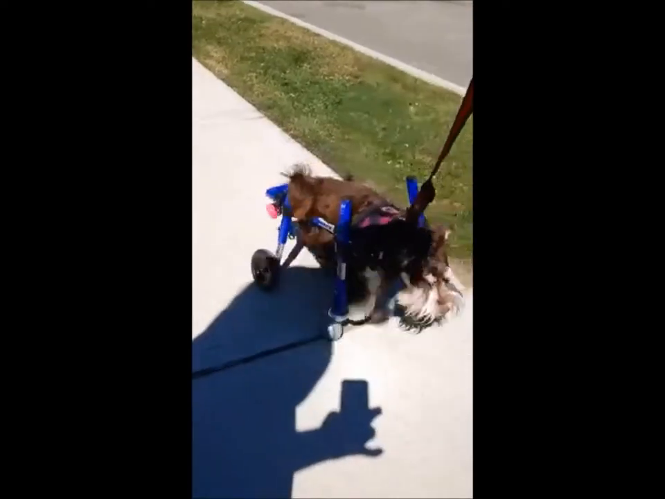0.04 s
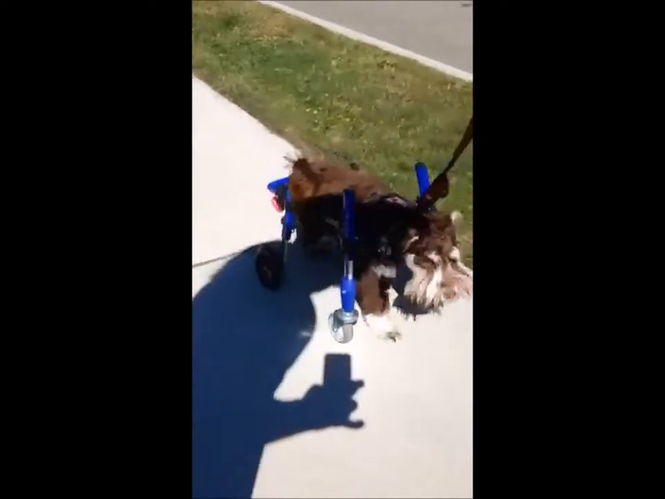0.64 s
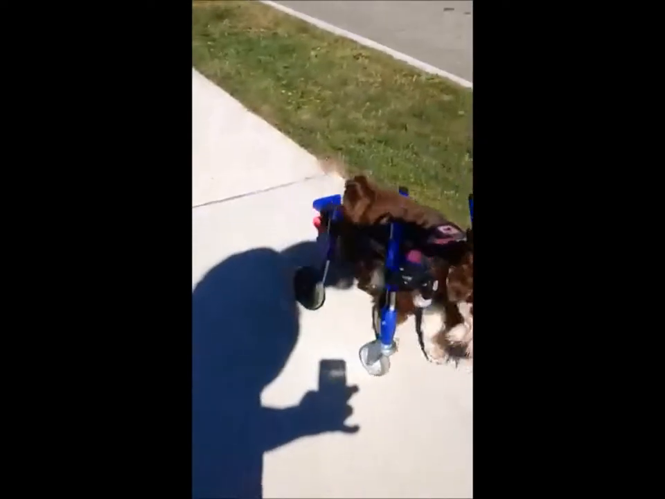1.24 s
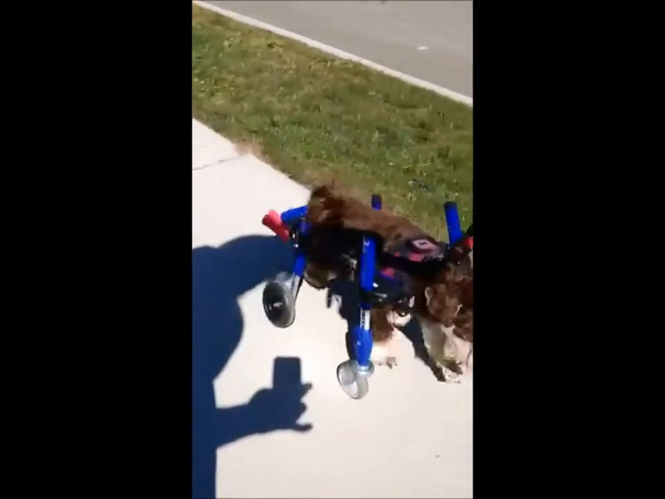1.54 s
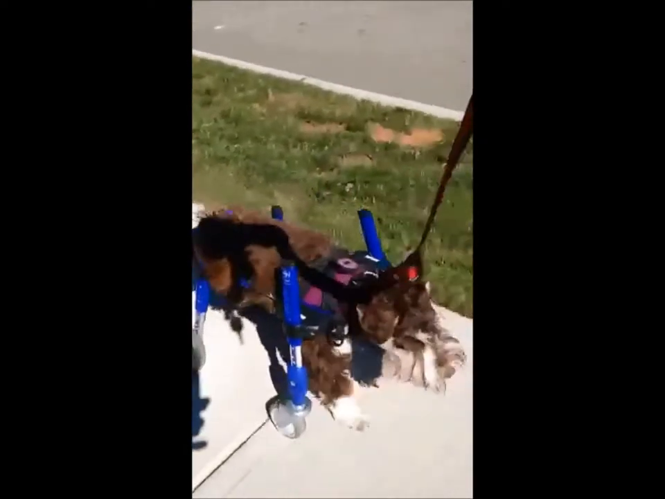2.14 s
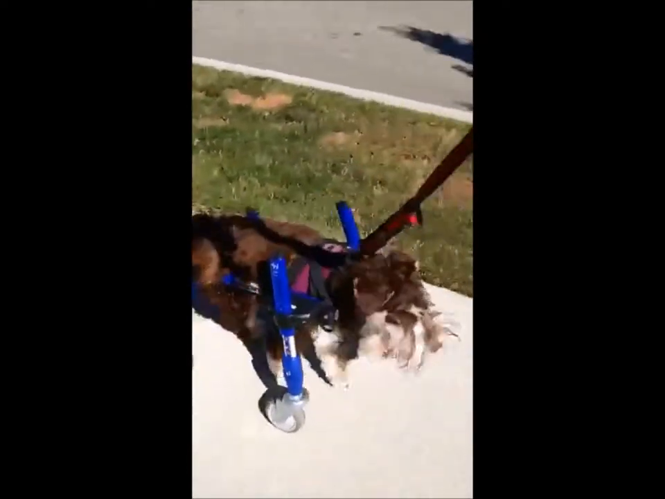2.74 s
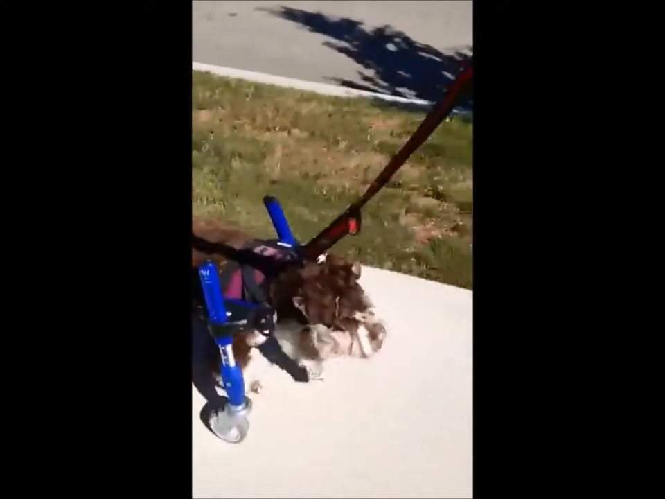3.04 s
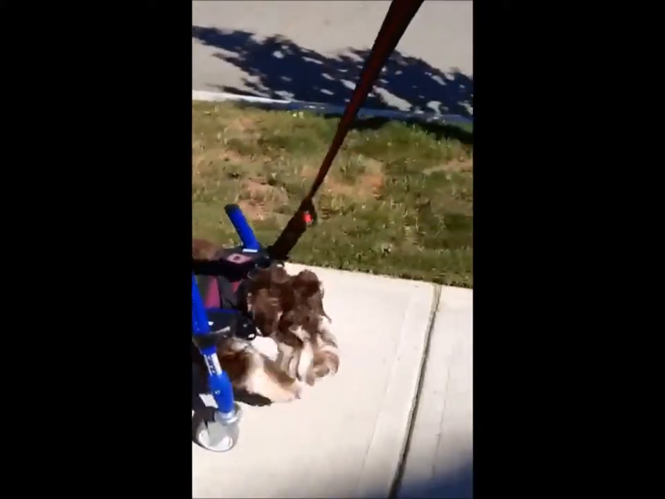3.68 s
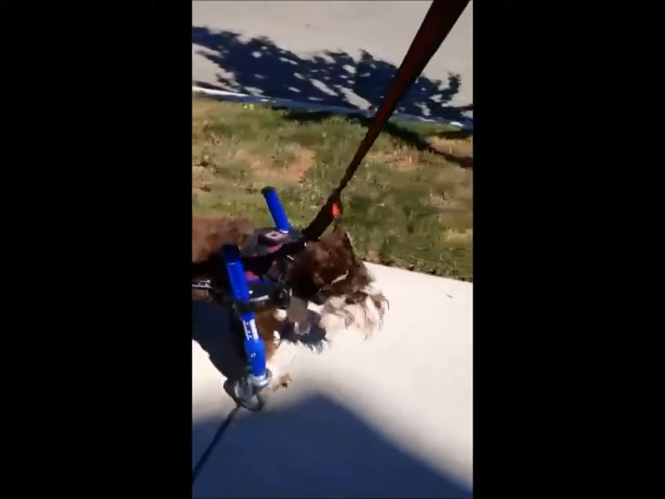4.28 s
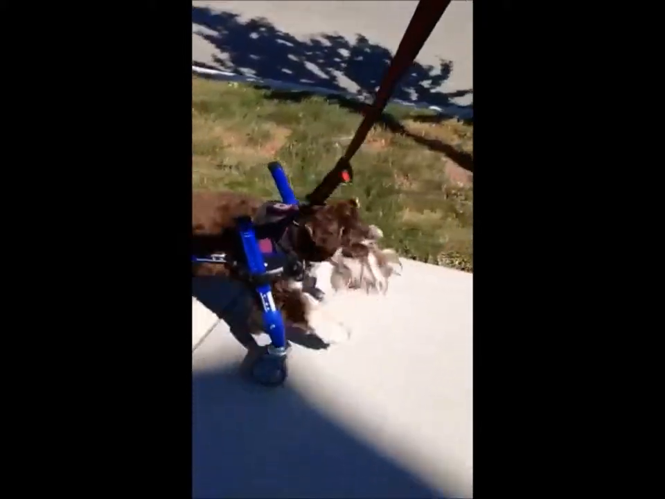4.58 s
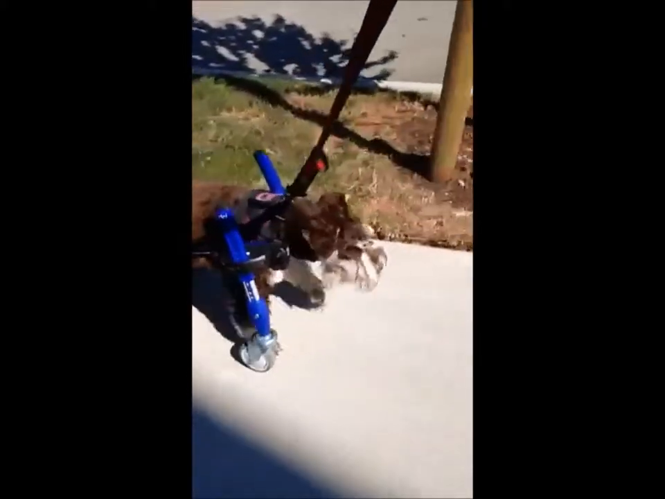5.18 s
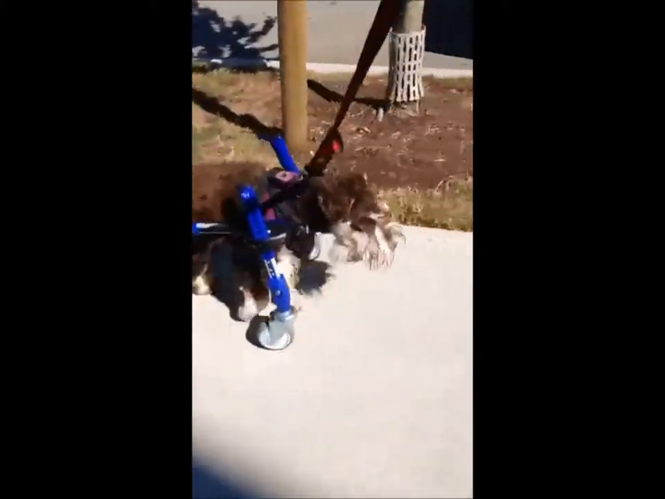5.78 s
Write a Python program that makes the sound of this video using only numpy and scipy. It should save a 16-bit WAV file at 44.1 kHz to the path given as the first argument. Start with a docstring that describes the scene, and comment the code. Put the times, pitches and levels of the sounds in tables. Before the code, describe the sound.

Gritty paw scuffs, claw ticks and rolling wheels of a dog's support cart clatter lightly along a sidewalk, with a little wind later.

```python
"""Small dog in a wheeled cart

Paws, soles and tyres scuff over a gritty concrete sidewalk by stick-slip friction; pads pat and claws
tick. Impacts at the joints between slabs thump the wheels and excite the modes of the cart's frame.
The dog huffs faintly through its resonant muzzle, and small metal parts chink. Later a breeze buffets
the hand-held microphone, a metre away, over the faint wash of the street."""
import sys
import numpy as np
from scipy import signal
from scipy.io import wavfile

SR = 44100
rng = np.random.default_rng(int(sys.argv[2]) if len(sys.argv) > 2 else 0)


def put_to_file(sound):
    """Save the sound as 16-bit audio at rate SR, in the file named by the first command-line argument."""
    columns = np.atleast_2d(sound).T  # one column per channel
    safe = np.clip(columns, -1, 1)
    whole_steps = np.round(safe * 32767)
    wavfile.write(sys.argv[1], SR, whole_steps.astype(np.int16))


N = 265437
TIME = np.arange(N) / SR


def amp(db):
    """Amplitude ratio of a level in decibels."""
    return 10 ** (np.asarray(db) / 20)


def unit(x):
    """Normalisation to an rms of one."""
    return x / np.sqrt(np.mean(x ** 2) + 1e-20)


def spectrum(points, size=2048):
    """Gain curve interpolated in log frequency, falling 12 dB per octave past the last point."""
    hz, db = np.transpose(points)
    f = np.fft.rfftfreq(size, 1 / SR) + 1
    return amp(np.interp(np.log(f), np.log(hz), db)) / np.maximum(f / hz[-1], 1) ** 2


def resonances(modes, size=2048):
    """Gain curve of damped resonances, summed in power."""
    f = np.fft.rfftfreq(size, 1 / SR)
    return np.sqrt(sum(amp(db) ** 2 / (1 + (2 * (f - hz) / width) ** 2) ** 2 for hz, width, db in modes))


def colour(x, gain):
    """Minimum-phase filtering: the response rings after a click, never before."""
    log_gain = np.log(np.maximum(np.r_[gain, gain[-2:0:-1]], 1e-5))
    response = np.fft.ifft(np.exp(np.conj(signal.hilbert(log_gain)))).real
    return signal.fftconvolve(x, response[:len(gain)])[:len(x)]


def steady(x, span_s):
    """Division by the running rms evens out slow changes of level and keeps the finer detail."""
    window = np.hanning(int(span_s * SR))
    power = signal.fftconvolve(x ** 2, window / window.sum(), "same")
    return x / np.sqrt(np.maximum(power, 1e-12))


def wander(cutoff_hz):
    """Random modulation: low-passed noise of unit rms."""
    return unit(signal.sosfilt(signal.butter(2, cutoff_hz, fs=SR, output="sos"), rng.standard_normal(N)))


def add(mix, start_s, sound):
    """Superposition of a sound on the mix."""
    part = mix[max(round(start_s * SR), 0):][:len(sound)]
    part += sound[:len(part)]


def slips(per_s, spread_db, decay_s):
    """Poisson process of slips, many small and a few large, as a power envelope of mean one."""
    strength = amp(spread_db * np.minimum(rng.exponential(1, N), 3.85))
    impulses = strength * (rng.random(N) < per_s / SR)
    power = signal.lfilter([1], [1, -np.exp(-1 / (decay_s * SR))], impulses ** 2)
    return power / power.mean()


def grains(low_hz, high_hz, per_s, spread_db, cycles, pitches=32):
    """Shot noise: tiny random impacts, each ringing for a few cycles at its own pitch."""
    t, out = np.arange(700) / SR, np.zeros(N)
    for hz in np.geomspace(low_hz, high_hz, pitches):
        swell = t * hz / cycles
        grain = swell * np.exp(-swell) * np.sin(2 * np.pi * hz * t)
        chance = rng.random(N) * pitches * SR / per_s
        for i in np.flatnonzero(chance < 1):
            weight = amp(spread_db * min(-np.log(chance[i]), 4))
            add(out, i / SR, (-1) ** i * weight * hz * grain)
    return unit(out)


def body_reflection(x, echo_db=-6.5, delay_s=0.0017, sway_s=0.000498, sway_hz=4):
    """Comb filtering: an echo off the swaying body and frame gives a slowly shifting colour."""
    echo = np.interp(TIME - delay_s - sway_s * np.tanh(wander(sway_hz)), TIME, x)
    return (x + amp(echo_db) * echo) / np.hypot(1, amp(echo_db))


# Tyre noise under the steps, fainter as the cart slows: time_s, level_db
ROLLING = [(0, -50.5), (.4, -46), (.95, -50), (1.05, -51.5), (1.2, -49), (1.44, -52.5), (1.7, -47.5),
           (2.17, -52), (2.5, -47), (2.95, -52.5), (3.3, -48.5), (4.3, -56.5), (4.65, -55.5), (4.8, -56.5),
           (4.95, -51), (5.15, -56), (5.38, -49), (5.52, -52.5), (6.02, -48)]
# Feet dragging over the concrete: start_s, length_s, scuff_db, grit_db, fizz_re_grit_db
FOOT_DRAGS = [(0.016, 0.094, -42.5, -48, 1), (0.225, 0.022, -39.5, -40, -8), (0.304, 0.086, -39.5, -41, -2),
              (0.578, 0.055, -43.5, -43, -7), (0.653, 0.079, -50, -50.5, 4), (0.743, 0.2, -52, -69, -2),
              (0.926, 0.12, -63, -48.5, 3.5), (1.112, 0.061, -44.5, -40, -1.5),
              (1.264, 0.13, -47, -42.5, -2), (1.547, 0.063, -39, -51.5, 2.5), (1.69, 0.12, -40, -41, -5),
              (1.749, 0.013, -37.5, -31, 0), (1.864, 0.14, -39.5, -40.5, -6),
              (2.004, 0.12, -48, -46.5, 0.5), (2.228, 0.11, -40.5, -37, -2), (2.367, 0.044, -40, -37.5, -6),
              (2.46, 0.045, -36.5, -30, -4.5), (2.562, 0.12, -40, -37, -1), (2.608, .04, -39, -43, -10),
              (2.695, 0.2, -44.5, -48, 2), (2.788, 0.092, -43.5, -38, -16), (3.036, 0.057, -43.5, -37, 0),
              (3.194, 0.041, -39, -44, -6), (3.252, 0.04, -50, -33.5, -4), (3.397, 0.067, -41, -42.5, -1),
              (3.614, 0.071, -42, -42.5, 0), (3.807, 0.1, -48.5, -43.5, -2), (3.958, .17, -47, -43, -2.5),
              (4.386, 0.074, -45, -44.5, -7), (4.479, 0.093, -41, -38, -3), (4.831, 0.09, -48, -54.5, -10),
              (4.94, 0.069, -45, -44.5, -5), (5.314, 0.076, -43.5, -46, -14),
              (5.379, 0.054, -48, -40.5, -1), (5.577, 0.023, -43, -50.5, 3), (5.654, 0.018, -64, -50, 8.5),
              (5.84, 0.043, -46, -38.5, -12), (5.973, 0.041, -44, -48.5, -19)]


def friction_gains(attack_s=0.0019, release_s=0.014):
    """Incoherent sources add in power: tyres and dragging feet set the scuff, grit and fizz gains."""
    rolling_db = np.interp(TIME, *np.transpose(ROLLING))
    power = amp([rolling_db, rolling_db - 0.5, rolling_db - 1]) ** 2
    for start_s, length_s, scuff_db, grit_db, fizz_db in FOOT_DRAGS:
        t = TIME - start_s
        drag = np.exp(np.minimum(t, 0) / attack_s - np.maximum(t - length_s, 0) / release_s)
        power += np.outer(amp([scuff_db, grit_db, grit_db + fizz_db]), drag) ** 2
    return np.sqrt(power)


# Spectra of the dull scuff and of crushed sand: frequency_hz, gain_db
SCUFF_SPECTRUM = [(60, -30), (170, -1), (250, -3.5), (340, -2.5), (470, 0.5), (760, -2), (1300, -2),
                  (1800, -7.5), (2600, -54), (5000, -19)]
GRIT_SPECTRUM = [(900, -20.5), (1900, -2.5), (2500, -4.5), (3400, -3), (4500, -5), (6500, -11), (8700, -6),
                 (12000, -14.5), (15500, -16.5)]


def friction(scuff_trim_db=-0.97, grit_trim_db=-0.16, fizz_hz=6200):
    """Stick-slip friction: pads and tyres catch and let go, scuffing dully and cracking sand."""
    scuff_gain, grit_gain, fizz_gain = friction_gains()
    catches = slips(per_s=540, spread_db=10.5, decay_s=0.0011)
    # soft pads drag in slips and pat in low grains
    pad_power = catches + slips(per_s=1500, spread_db=4.5, decay_s=0.00043)
    pads = unit(np.sqrt(pad_power) * rng.standard_normal(N))
    pads += amp(-1) * grains(278, 3150, per_s=1100, spread_db=3.5, cycles=0.94)
    scuff = steady(colour(pads, spectrum(SCUFF_SPECTRUM)), span_s=0.19)
    # the same catches crush the sand, and loose grains tick on their own
    sand_power = catches + slips(per_s=2400, spread_db=6, decay_s=0.00079)
    sand = unit(np.sqrt(sand_power) * rng.standard_normal(N))
    sand += amp(-6) * grains(1470, 7750, per_s=2900, spread_db=5.5, cycles=1.5)
    grit = steady(body_reflection(colour(sand, spectrum(GRIT_SPECTRUM))), span_s=0.08)
    # a heavy foot crunches low, a light touch fizzes high
    fizz = signal.sosfiltfilt(signal.butter(3, fizz_hz, "high", fs=SR, output="sos"), grit)
    crunch = grit_gain * (grit - fizz) + fizz_gain * fizz
    return amp(scuff_trim_db) * scuff_gain * scuff + amp(grit_trim_db) * crunch


# Wheel vibration, strongest on the first slabs: time_s, level_db
WHEEL_RUMBLE = [(0, -56), (.35, -46.5), (.6, -55), (1.3, -62), (2.4, -54.5), (2.9, -73.5), (6.02, -64)]


def wheel_rumble(pitch_hz=172, width_hz=55):
    """Forced vibration: rough concrete drives the wheels at their low resonance."""
    shake = colour(rng.standard_normal(N), resonances([(pitch_hz, width_hz, 0)], size=8192))
    return amp(np.interp(TIME, *np.transpose(WHEEL_RUMBLE))) * steady(shake, span_s=0.46)


# Background of the street: frequency_hz, gain_db
STREET_SPECTRUM = [(20, -24), (45, 7), (75, 0), (170, -6.5), (267, -0.5), (500, -31), (900, -40),
                   (2500, -13), (4000, -25), (8500, -17), (15000, -20.5)]


def street(level_db=-62):
    """Stationary noise: the faint, mostly low wash of the street."""
    return amp(level_db) * unit(colour(rng.standard_normal(N), spectrum(STREET_SPECTRUM)))


# Gusts at the microphone: time_s, level_db
GUSTS = [(0, -63.5), (.95, -48), (1.45, -46), (1.88, -63), (1.93, -53.5), (3.37, -59), (3.5, -46),
         (3.75, -60.5), (4.11, -50.5), (4.44, -52), (4.54, -35), (4.66, -43), (4.96, -40), (5.07, -46),
         (5.16, -40.5), (5.33, -39.5), (5.55, -48), (6.02, -41)]
# Their buffeting: frequency_hz, gain_db
BUFFET_SPECTRUM = [(15, -30), (32, -19), (55, -1.5), (72, -3.5), (88, 0), (105, -4), (135, -8),
                   (170, -15.5), (220, -17), (500, -46)]


def breeze():
    """Turbulence: moving air makes low, random pressure fluctuations at the microphone."""
    buffet = colour(rng.standard_normal(N), spectrum(BUFFET_SPECTRUM, size=16384))
    return amp(np.interp(TIME, *np.transpose(GUSTS))) * steady(buffet, span_s=0.84)


# Low, middle and high bands of an impact: frequency_hz, gain_db
KNOCK_SPECTRUM = [(80, -18.5), (250, -5.5), (480, 5.5), (900, 0), (1500, 2), (1900, -1.5), (2800, -40)]
CLACK_SPECTRUM = [(1100, -25), (1900, 2), (3200, 6), (4800, 5.5), (6500, 2), (8000, -35), (11000, -24)]
SPARKLE_SPECTRUM = [(4500, -16.5), (7200, -1.5), (9000, -3), (12000, -10), (15500, -17.5)]
SKID_LEAD_S = 0.0046  # time from the start of an impact sound to the blow itself


def impact(knock_db, clack_db, sparkle_db, ring_hz, decay_s, skid_share, tail_db=-19, ring_q=7):
    """Impact noise: a contact skids, strikes, chatters and rings; band levels are rms over 10 ms."""
    size, tail_s = 2048, 0.012
    t, out = np.arange(size) / SR - SKID_LEAD_S, np.zeros(size)
    before, after = np.minimum(t, 0), np.maximum(t, 0)
    skid = np.exp(before / (skid_share * decay_s))
    chatter = np.exp(-after / decay_s) + amp(tail_db) * np.exp(-after / tail_s)
    ring = 1.5 + resonances([(ring_hz, ring_hz / ring_q, 7)])
    bands = (KNOCK_SPECTRUM, knock_db), (CLACK_SPECTRUM, clack_db), (SPARKLE_SPECTRUM, sparkle_db)
    for points, level_db in bands:
        blow = colour(skid * chatter * rng.standard_normal(size), spectrum(points) * ring)
        out += amp(level_db) * blow / np.linalg.norm(blow) * np.sqrt(0.01 * SR)
    return out


# Pads landing: time_s, knock_db, ring_hz
PAD_LANDINGS = [(.044, -38.5, 560), (.07, -43, 900), (0.2102, -39, 1630), (.622, -35.5, 1320),
                (.691, -44, 800), (.733, -41, 696), (0.77, -36.5, 830), (.923, -32, 455),
                (0.957, -36.5, 620), (.979, -33, 600), (0.99, -35, 1760), (1.211, -40.5, 523),
                (1.245, -39.5, 504), (1.548, -37, 714), (1.573, -35.5, 1390), (1.694, -41, 1190),
                (1.904, -39.5, 695), (1.928, -34.5, 1280), (2.037, -37.5, 660), (2.22, -41.5, 420),
                (2.377, -40, 1200), (2.471, -34, 1290), (2.624, -33, 1430), (2.855, -31, 1720),
                (3.259, -26.5, 1030), (3.292, -33, 1310), (3.69, -34, 1260), (3.847, -42.5, 915),
                (3.961, -44, 1010), (4.09, -30, 820), (4.869, -44, 710), (4.953, -35.5, 1390),
                (5.03, -36, 935), (5.411, -35, 1420), (5.465, -41.5, 523), (5.562, -44, 1380),
                (5.851, -35.5, 1360)]


def pad_pats():
    """Soft impact: the long contact of a pad gives a dull pat with little treble."""
    out = np.zeros(N)
    for time_s, knock_db, ring_hz in PAD_LANDINGS:
        pat = impact(knock_db, knock_db - 9, knock_db - 18, ring_hz, decay_s=0.0039, skid_share=0.22)
        add(out, time_s - SKID_LEAD_S, pat)
    return out


# Claws and coarse grains striking concrete: time_s, clack_db, sparkle_db
CLAW_STRIKES = [(.176, -38, -37), (.352, -28, -30.5), (0.37, -38.5, -45), (.545, -40.5, -47),
                (0.588, -43, -45), (.663, -42, -59), (.681, -41, -62), (.759, -37, -37.5), (.980, -36, -48),
                (1.173, -34.5, -37), (1.305, -38, -45.5), (1.343, -42, -49), (1.392, -41, -49),
                (1.469, -36.5, -41), (1.519, -41, -36.5), (1.651, -46, -44), (1.731, -34.5, -43),
                (1.761, -30, -39), (1.785, -39.5, -46), (1.874, -36.5, -47), (1.894, -33, -45),
                (1.917, -39, -42), (1.979, -37.5, -53), (2.099, -39.5, -47), (2.33, -32, -39),
                (2.358, -33, -42), (2.413, -29.5, -34), (2.422, -37, -49), (2.442, -38, -45),
                (2.446, -35, -49), (2.512, -37.5, -52), (2.546, -48, -62), (2.574, -35, -29.5),
                (2.608, -36, -48), (2.691, -35.5, -43), (2.709, -37, -55), (2.799, -39, -58),
                (2.891, -45, -41), (3.023, -35.5, -36), (3.066, -34, -40), (3.078, -43, -53),
                (3.277, -40, -40), (3.41, -33.5, -38), (3.431, -41, -42), (3.484, -37.5, -37),
                (3.492, -33.5, -43), (3.629, -44, -52), (3.65, -34, -48), (3.735, -42, -48),
                (3.775, -51, -43), (3.829, -30, -41), (3.849, -48, -54), (3.862, -39, -45),
                (3.883, -33.5, -45), (3.914, -37.5, -63), (4.043, -38.5, -42), (4.192, -42.5, -55),
                (4.27, -49, -56), (4.296, -46.5, -47), (4.359, -42, -51), (4.417, -34.5, -38),
                (4.438, -46, -59), (4.586, -36, -41), (4.593, -37, -43), (4.656, -48, -53),
                (4.723, -42, -47), (4.831, -41.5, -52), (4.897, -32.5, -32.5), (4.911, -36, -44),
                (4.956, -40, -41.5), (4.978, -43, -39.5), (4.998, -38.5, -60), (5.063, -64, -40.5),
                (5.234, -43, -56), (5.345, -42.5, -57), (5.386, -36, -43), (5.392, -32.5, -32.5),
                (5.471, -45, -42.5), (5.629, -46.5, -42.5), (5.684, -42.5, -50), (5.871, -41, -53),
                (5.878, -43, -55), (5.889, -37.5, -54), (5.909, -43, -37), (5.98, -41.5, -59)]


def claw_ticks(centre_hz=4590):
    """Hard impact: the brief contact of a claw gives a bright tick."""
    out = np.zeros(N)
    for time_s, clack_db, sparkle_db in CLAW_STRIKES:
        ring_hz = centre_hz * 2 ** rng.uniform(-0.44, 0.42)
        tick = impact(clack_db - 11, clack_db, sparkle_db, ring_hz, decay_s=0.0015, skid_share=0.57)
        add(out, time_s - SKID_LEAD_S, tick)
    return out


# Wheels dropping into a joint or bumping: start_s, gain_db, pitch_hz
WHEEL_DROPS = [(0.223, -18.5, 256), (0.29, -16, 258), (0.311, -16, 189), (.323, -13.5, 195),
               (2.235, -14.5, 237), (2.255, -23, 178), (2.283, -16.5, 228), (2.302, -16, 333),
               (2.641, -12.5, 484), (2.650, -13, 550), (4.466, -13.5, 169), (4.476, -21, 350),
               (4.517, -13, 226)]


def wheel_thumps(rise_s=0.0026, decay_s=0.0027):
    """Heavily damped oscillation: a wheel swings briefly as it takes the weight."""
    t, out = np.arange(4000) / SR, np.zeros(N)
    envelope = (1 - np.exp(-t / rise_s)) * np.exp(-t / decay_s)
    for start_s, gain_db, pitch_hz in WHEEL_DROPS:
        add(out, start_s, amp(gain_db) * envelope * np.sin(2 * np.pi * pitch_hz * t))
    return out


# Modes of the cart's metal tubes: pitch_hz, gain_db, t60_s
FRAME_MODES = [(2050, 1, 0.025), (2950, 3, 0.019), (3340, -2, 0.017), (4100, 3, 0.017), (5600, -6, 0.022),
               (6180, -4, 0.016), (6780, -4, 0.02)]


def frame_ring(ring_db, ring_hz, favour_db=6, favour_hz=160, detune=0.011, rise_s=0.0012):
    """Free vibration: the tubes ring after a jolt, with a boost for modes near the blow's pitch."""
    t = np.arange(3000) / SR
    out = np.zeros_like(t)
    for pitch_hz, gain_db, t60_s in FRAME_MODES:
        level_db = ring_db + gain_db + favour_db / (1 + ((pitch_hz - ring_hz) / favour_hz) ** 2)
        cycles = pitch_hz * (1 + detune * rng.uniform(-0.72, 1)) * t + rng.random()
        out += amp(level_db - 60 * t / t60_s) * np.sin(2 * np.pi * cycles)
    return out * (1 - np.exp(-t / rise_s))


# Jolts of the cart, hardest at the joints between slabs:
# time_s, clack_db, knock_db, sparkle_db, ring_hz, decay_s, ring_db
CART_JOLTS = [(0.2262, -33.5, -46, -48, 3000, 0.0025, -38), (.230, -27.5, -40, -43, 3020, .003, -26),
              (.298, -36, -38, -37.5, 1630, 0.0032, -48), (.327, -30.5, -34, -42, 3420, 0.0007, -34),
              (.335, -32, -37, -45, 4100, 0.0009, -41), (.345, -31, -33.5, -41, 4400, 0.00063, -42),
              (1.5, -27, -33, -28.5, 2020, .0019, -45), (1.946, -31.5, -35.5, -31.5, 706, 0.013, -48),
              (2.062, -32, -34.5, -33, 5800, 0.00059, -42),
              (2.2358, -29, -38.5, -34.5, 3000, 0.0012, -25.5), (2.2425, -37, -32, -52, 2050, 0.0011, -40),
              (2.258, -21.5, -28.5, -29, 3340, 0.0034, -25), (2.267, -41, -33, -38, 1390, 0.00091, -38),
              (2.2856, -27.5, -29, -34, 3000, .0014, -20), (2.291, -35, -35, -39, 3300, 0.0022, -35),
              (2.3018, -27, -40, -44, 3300, .0006, -30), (2.3045, -20.5, -31.5, -21.5, 2000, 0.0014, -19),
              (2.64, -26, -41, -39, 537, .0019, -43), (2.65, -28, -27.5, -37, 520, 0.0029, -38),
              (2.996, -28, -36, -32.5, 2590, 0.0039, -39), (3.271, -28.5, -29.5, -50, 1290, 0.0051, -44),
              (4.2447, -42, -46, -34, 6860, 0.00076, -52), (4.2485, -27, -45.5, -31.5, 4000, 0.0021, -42),
              (4.3983, -24.5, -33, -42, 5500, 0.0014, -25), (4.403, -41, -38, -33, 3020, 0.0019, -29),
              (4.4743, -19, -25.5, -29.5, 3800, 0.0027, -35), (4.483, -30, -34.5, -39, 467, 0.0028, -37),
              (4.5198, -32, -32, -48, 1980, 0.00055, -40), (4.526, -29.5, -34.5, -37, 4960, 0.0038, -42),
              (4.541, -39, -36.5, -39, 4130, .0015, -46)]


def cart_rattle():
    """Impulsive excitation: each jolt clacks the frame and sets its tubes ringing."""
    out = np.zeros(N)
    for time_s, clack_db, knock_db, sparkle_db, ring_hz, decay_s, ring_db in CART_JOLTS:
        clack = impact(knock_db, clack_db, sparkle_db, ring_hz, decay_s,
                       skid_share=0.31, tail_db=-18.5, ring_q=20)
        add(out, time_s - SKID_LEAD_S, clack)
        add(out, time_s, frame_ring(ring_db, ring_hz))
    return out


# The dog's breaths, in step with its stride: start_s, length_s, level_db
BREATHS = [(0.8, 0.086, -38.5), (3.357, 0.068, -38.5), (4.184, 0.075, -43.5), (4.439, 0.067, -42.5),
           (5.068, 0.082, -41), (5.521, 0.08, -46), (5.952, 0.066, -54)]
# Resonances of its open muzzle: centre_hz, width_hz, gain_db
MUZZLE_FORMANTS = [(1023, 150, -3.5), (1570, 800, -6.5), (2135, 270, 2.5), (2900, 740, -10),
                   (3420, 450, -5.5), (4440, 3000, -13.5)]


def huffs(taper=0.78):
    """Source and filter: short puffs of breath noise are shaped by the formants of the muzzle."""
    out = np.zeros(N)
    for start_s, length_s, level_db in BREATHS:
        air = unit(colour(rng.standard_normal(N // 20), resonances(MUZZLE_FORMANTS)))
        puff = air[:int(length_s * SR)]
        add(out, start_s, amp(level_db) * puff * signal.windows.tukey(len(puff), taper))
    return out


# Chinks of a small metal part, likely the leash clasp: start_s, level_db
CLASP_CHINKS = [(3.776, -49), (4.555, -36), (4.562, -44), (5.063, -41.5), (5.091, -48.5)]
# Its modes: pitch_hz, gain_db, t60_s
CLASP_MODES = [(6300, 6.5, .03), (6700, 2, .03), (9240, -1, .04), (10780, 1, 0.05), (11610, -1, .04),
               (12400, -4, .07)]


def clasp(detune=0.0088):
    """Modal ringing: light metal sounds high, inharmonic partials after each chink."""
    t, out = np.arange(16000) / SR, np.zeros(N)
    for start_s, level_db in CLASP_CHINKS:
        for pitch_hz, gain_db, t60_s in CLASP_MODES:
            hz = pitch_hz * (1 + detune * rng.uniform(-1, 1))
            add(out, start_s, amp(level_db + gain_db - 60 * t / t60_s) * np.sin(2 * np.pi * hz * t))
    return out


def swinging(ring, depth=0.69, wobble_hz=70):
    """Amplitude modulation: metal rings unsteadily as it swings."""
    return ring * (1 + depth * wander(wobble_hz)) / np.hypot(1, depth)


# Thin, high rings, perhaps of a tag: start_s, level_db, t60_s
TAG_PINGS = [(3.94, -51, .4), (4.59, -61, .6)]


def tag(pitch_hz=12610, rise_s=0.012):
    """Light damping: a single mode swells and lingers as a pure tone."""
    t, out = np.arange(16000) / SR, np.zeros(N)
    for start_s, level_db, t60_s in TAG_PINGS:
        envelope = amp(level_db - 60 * t / t60_s) * (1 - np.exp(-t / rise_s))
        add(out, start_s, envelope * np.sin(2 * np.pi * pitch_hz * t))
    return out


# The strongest gusts, fluttering at nearly one pitch: start_s, length_s, level_db, pitch_hz
GUST_FLUTTERS = [(4.489, .17, -33.5, 88), (4.639, 0.18, -37.5, 92.4), (4.787, 0.038, -38, 92),
                 (4.898, 0.11, -36, 97.6), (5.115, 0.13, -32.5, 106), (5.28, 0.11, -38.5, 102.5)]


def gust_flutter(waver=0.065, waver_hz=25):
    """Random frequency modulation: each strong gust swells into a low, wavering throb."""
    out, drift = np.zeros(N), wander(waver_hz)
    for start_s, length_s, level_db, pitch_hz in GUST_FLUTTERS:
        hz = pitch_hz * (1 + waver * drift[int(start_s * SR):][:int(length_s * SR)])
        swell = amp(level_db) * np.sqrt(2) * np.hanning(len(hz))
        add(out, start_s, swell * np.sin(2 * np.pi * np.cumsum(hz) / SR))
    return out


def open_air(x, wet_db=-19, gap_s=0.003, decay_s=0.0079):
    """Early reflections: outdoors only the ground, the cart and the walker scatter a little sound."""
    t = np.arange(8000) / SR
    scatter = rng.standard_normal(len(t)) * np.exp(-t / decay_s) * (t > gap_s)
    return x + amp(wet_db) * signal.fftconvolve(x, scatter / np.linalg.norm(scatter))[:N]


def scene():
    """Superposition in one channel: the dog and cart with their reflections, the wind and the street."""
    impacts = cart_rattle() + claw_ticks() + pad_pats() + wheel_thumps()
    walk = impacts + friction() + wheel_rumble() + swinging(clasp() + tag()) + huffs()
    return (open_air(walk) + breeze() + street() + gust_flutter())[None]


def record(dry):
    """Band limiting: a steep linear-phase low-pass removes the highest treble."""
    cutoff_hz = 15550
    lowpass = signal.firwin(401, cutoff_hz, window=("kaiser", 9), fs=SR)
    return signal.oaconvolve(dry, lowpass[None], "same")


dry = scene()
out = record(dry)
put_to_file(out)
```